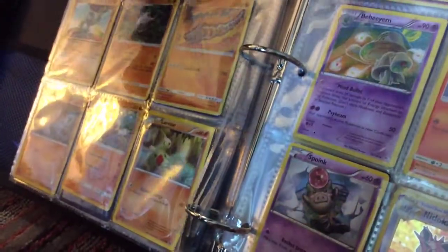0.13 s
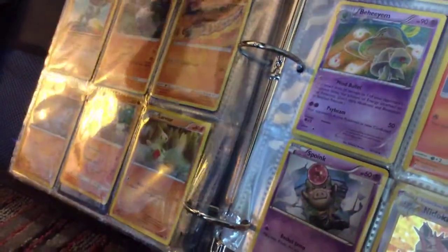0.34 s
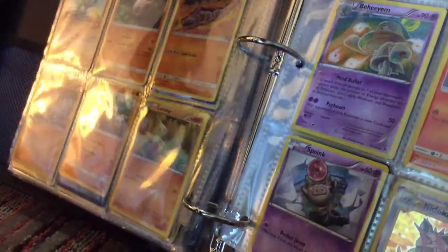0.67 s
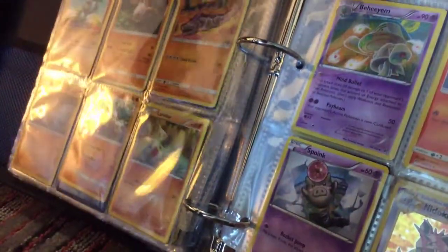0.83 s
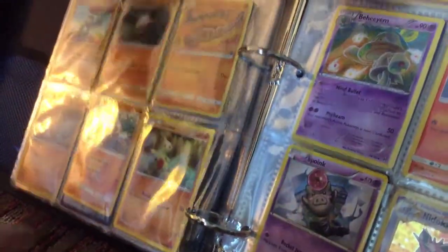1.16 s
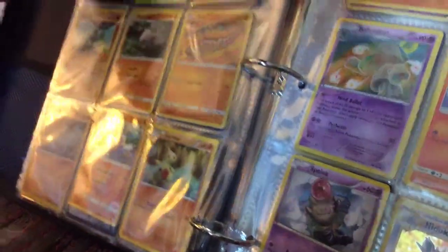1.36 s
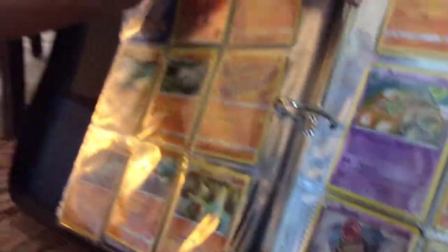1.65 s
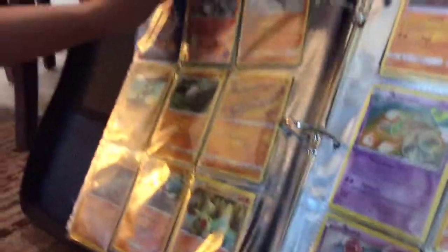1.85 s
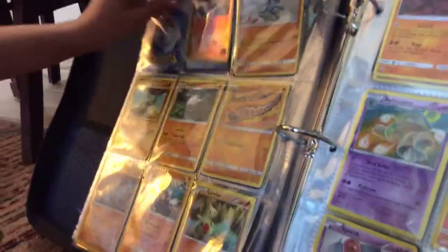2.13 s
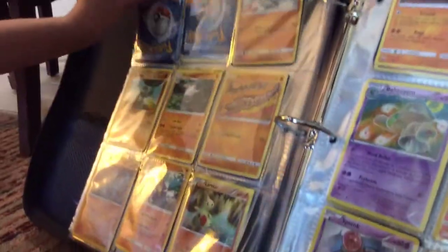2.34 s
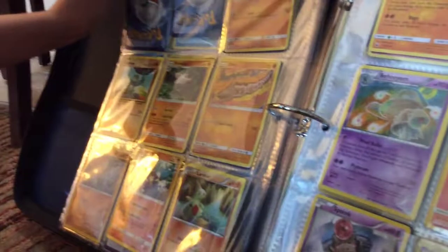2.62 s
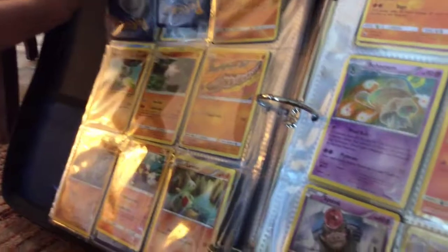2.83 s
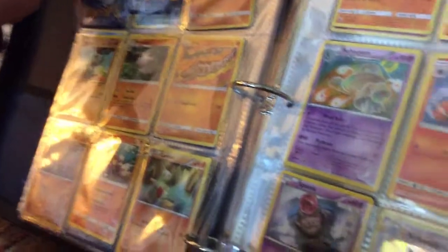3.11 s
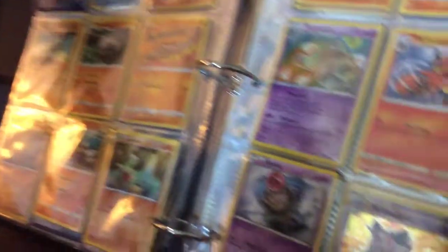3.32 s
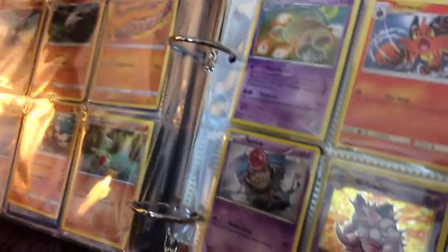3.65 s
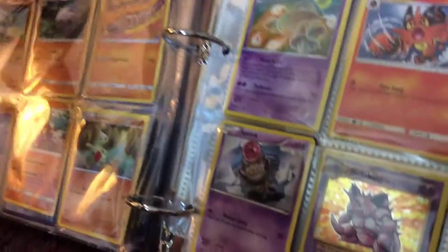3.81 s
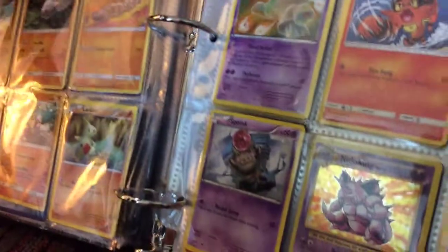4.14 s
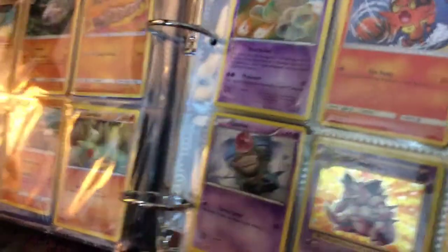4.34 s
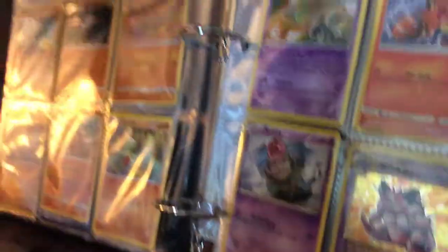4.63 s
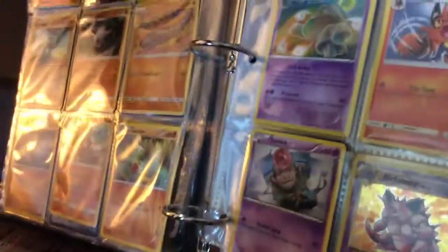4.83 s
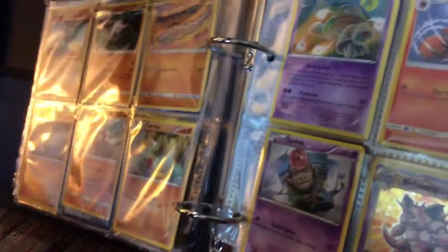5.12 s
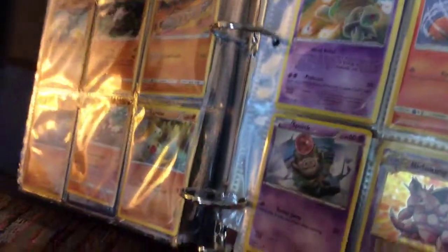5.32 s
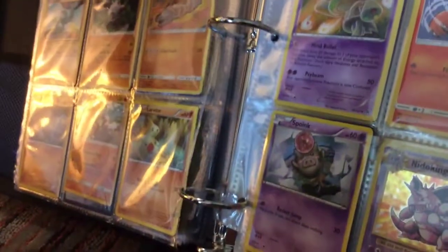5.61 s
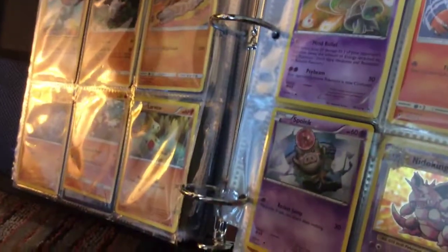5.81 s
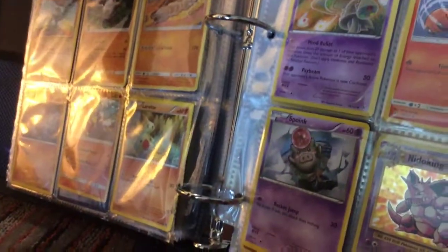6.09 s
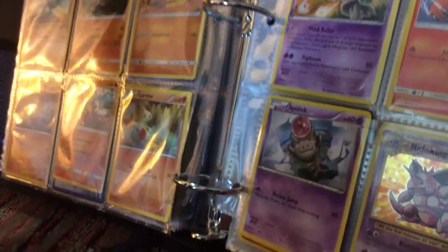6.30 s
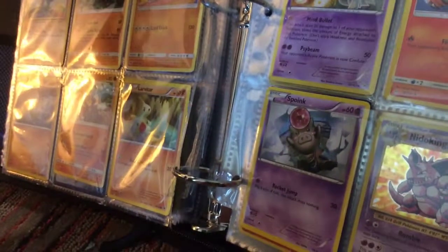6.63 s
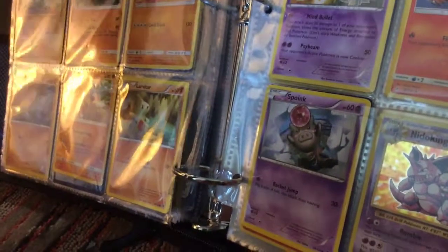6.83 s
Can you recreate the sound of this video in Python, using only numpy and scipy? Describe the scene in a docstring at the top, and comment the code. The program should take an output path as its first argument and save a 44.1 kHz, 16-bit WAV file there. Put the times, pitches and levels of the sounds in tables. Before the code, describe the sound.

Thin plastic pages crinkle in a ring binder: sharp treble-heavy pops, small pitched ticks, faint low knocks and brief papery rubs. A strong snap cluster early on gives way to sparse crackling, then isolated sharp clicks and a final busy flurry. Soft low fan rumble and airy rush continue underneath. Close, dry phone pickup indoors with very little room tail.

```python
"""Stiff clear plastic sleeve pages of a ring binder, bent and slid by hand close to a phone in a quiet room.
From the start a far fan hums and rushes, as filtered noise and a wavering sine, under snaps and short hiss.
Creases snap as bursts of slips coloured by resonances, loudest near 1.3 s; rubbing is grainy noise in the
same four bands. From 1.3 s short pitched ticks and low knocks join, each one narrow resonance; from 2.8 s
a few low scuffs of noise. Snaps thin out around 3 s, return, and crowd again from 6.4 s to the end near 7 s."""
import sys
import numpy as np
from scipy import signal
from scipy.fft import rfft, irfft, next_fast_len
from scipy.io import wavfile
from scipy.ndimage import uniform_filter1d

SR = 44100
rng = np.random.default_rng(int(sys.argv[2]) if len(sys.argv) > 2 else 0)


def to_wav(sig):
    """Store sig (one row per channel, or 1-D mono) as 16-bit WAV at the path in sys.argv[1].

    Samples outside -1..1 are clipped; the rate is SR.
    """
    pcm = np.clip(np.atleast_2d(sig), -1, 1) * 32767
    pcm = np.round(pcm).astype(np.int16)
    wavfile.write(sys.argv[1], SR, pcm.T)  # frames by channels


N = 306936

# Settings named WANDER, FLICKER, PATCHY or CATCH scale walk(), whose rms is about 1.4.
# Source levels are ahead of the room and the phone.

# Creases snapping. Each row: start in seconds, peak of the high band in dB, low, mid and top bands
# over the high band in dB, tear decay in ms (limited to 0.1-9 in use).
CREASE_SNAPS = [(0.0593, -17.5, -51, -56.5, -2, 2.6), (0.214, -29, -15.5, -17, -12, 0.93),
                (0.271, -16.5, -34, -22, -11, 1.2), (0.275, -21.5, -13, -15, -3, 2.9),
                (0.2811, -19.5, -22, -9, 0.5, 3), (0.3313, -16.5, -17, -13, -7, 3.5),
                (0.4058, -36.5, -8, -7, -9, 2.3), (0.536, -25.5, -31, -10.5, -8, 0.47),
                (0.6755, -34.5, -13.5, -10, -2, 5.1), (0.9558, -25.5, -28, -9.5, -9, 3.3),
                (0.988, -34.5, -29, -8.5, -9, 2.7), (1.0278, -33.5, -19, -24, -1, 4.3),
                (1.0646, -35.5, -12, -18, -8, 3), (1.2178, -40, -7.5, 1, 11, 2),
                (1.2572, -9.5, -18, -14.5, 1, 2.3), (1.2721, -2.5, -34, -46, -10, 1.8),
                (1.285, -35, -9, 1, -6, 3.7), (1.3193, -22.5, -19, -12, -7, 11),
                (1.3255, -21, -15, -18, -20, 1.6), (1.3281, -19, -13.5, -7, -8, 4.7),
                (1.338, -23, -40, -30, -1, 0.65), (1.418, -35, -10.5, -10, -4, 2.2),
                (1.4568, -22.5, -32, -12, -8, 0.53), (1.4699, -8.5, -22, -5.5, -7.5, 2.3),
                (1.482, -41, -19, 4, -6.5, 3.5), (1.5367, -39, -2.5, 1, -3, 3.8),
                (1.561, -33, -26, -7, -20, 1.5), (1.5766, -16, -24, -23.5, -14, 2.7),
                (1.6135, -37, -5, -4, -13, 2.3), (1.7991, -35, -23, -1.5, -25, 1.7),
                (1.81, -43.5, 6, -8, -7, 2.8), (1.8425, -26.5, -12, -4, -7, 3.7),
                (1.855, -40, -8, -7, -12, 2.7), (1.8622, -30.5, -9.5, -11, 1, 3.3),
                (1.9426, -38, -8, -8, -11, 3), (1.9523, -25.5, -26, -5, 6.5, 1.83),
                (1.957, -28.5, -10, -9, -14, 9), (1.972, -35.5, -8, -0.5, -2, 6),
                (1.9928, -36.5, -14, -3, 4, 1.7), (2.1892, -12, -25, -14, -6, 2.27),
                (2.227, -28, -10, -10, -15, 1.4), (2.273, -40.5, -9, 4, -11, 3.3),
                (2.4448, -22, -23, -16.5, -7, 2.1), (2.566, -18.5, -30, -16, -4, 2.1),
                (2.7721, -47.5, 8.5, 3.5, -1, 4.2), (3.2011, -27, -19, -10, -7, 3.1),
                (3.4432, -32.5, -16, -11.5, -1, 2), (3.712, -36.5, -14, -10.5, -4, 5),
                (3.8626, -15.5, -31, -35, -7, 2.2), (3.8988, -35.5, -6, 0, 6, 0.67),
                (3.9888, -13.5, -63, -11, -1.5, 2), (4.023, -34.5, -35, -9, -11, 9.7),
                (4.1462, -20.5, -27, -24, -5, 2.9), (4.1742, -24.5, -5, 3, 4, 2.7),
                (4.488, -39, -11.5, -8, -12, 2.4), (4.5478, -45, -6, -5, 15, 3.5),
                (4.571, -36.5, -4, -2, 7, 4), (4.6333, -29, -18, -12, -18, 1.7),
                (4.6812, -42.5, 1, -4, -1, 5.1), (4.7274, -39, -18, -18, 3, 4.6),
                (4.8418, -12.5, -16, -21.5, -3.5, 2.2), (4.9591, -33, -15, -5, 2.5, 2.6),
                (4.9688, -41, -11, -7, -7.5, 1.2), (5.038, -35.5, -28, -21, 8.5, 0.81),
                (5.161, -37.5, -11.5, -15, -2, 4.9), (5.3266, -35.5, 0, -7, 6, 5.5),
                (5.427, -38.5, -17, -25, -5, 2.2), (5.5275, -37, -36, -30, 2, 2.1),
                (6.0117, -24.5, -17, -12.5, -2, 3.1), (6.0157, -32, -39, -7, 2, 5.8),
                (6.182, -28, -20, -12, -9, 2.1), (6.3588, -40.5, -16, -8, 7, 1.1),
                (6.3892, -17.5, -21, -17.5, -6, 2.35), (6.4832, -31, -13, -13, 10, 5),
                (6.488, -27, -15, -22, -15.5, 4.5), (6.515, -18, -46, -26, -28, 2.2),
                (6.5295, -17.5, -22, -13.5, -8, 4.9), (6.5506, -14.5, -21, -20, -3, 0.83),
                (6.8494, -19.5, -24, -9, -11, 1.8), (6.89, -28, -4.5, -5, -1.5, 4.8)]
# Lesser creases that tick clearly. Each row: start in seconds, peak of the high band in dB.
CLEAR_TICKS = [(0.3651, -42), (0.4703, -43.5), (1.0437, -41), (1.3654, -40.5), (1.6276, -40.5),
               (2.1111, -43), (2.8135, -45.5), (2.9602, -52), (3.008, -44), (3.1685, -47), (3.5803, -52),
               (4.3071, -44.5), (4.8534, -42), (5.0514, -44), (5.1708, -36), (5.3916, -46), (5.4405, -41.5),
               (6.2517, -55), (6.7287, -44)]
# Resonances that colour the snaps and hiss, in four bands. Each row: nominal frequency in Hz,
# width in Hz, relative strength in dB.
HIGH_MODES = [(6790, 650, -9.5), (7310, 990, -10.5), (8300, 980, -1), (9475, 580, 1.5)]
LOW_MODES = [(1110, 180, 8.2), (1912, 307, 16.6)]
MID_MODES = [(3590, 610, 1.7), (4300, 610, -1.2)]
TOP_MODES = [(10510, 530, 17.9), (12420, 2100, 14), (13170, 1400, 14)]
LEAD_IN_DB, LEAD_IN_MS = -21, 4
RELEASE_MS, SLIP_SPREAD_DB = 18, 3.5  # first slip = RELEASE_MS / tear ms
LINGER = 0.5  # share of the tear that decays at the plain rate
PITCH_SPREAD, MODE_SPREAD_DB = 0.03, 2.5  # PITCH_SPREAD: relative, drawn per snap and band

# Mean levels of a small tick's low, mid and top bands, in dB over the high band.
SMALL_TICK_BANDS_DB = [-15, -8, -2]
TICK_COLOUR_DB, TICK_SPREAD_DB = 6.5, 2
TICK_OVER_HISS_DB = 10  # high band over dull hiss gain
TICK_TEAR_MS = 1.5  # median
TICK_CROWDING = 0.32  # exponent: pull of ticks towards firm strokes

# Strokes of sheet over sheet. Each row: start of full pressure in seconds, hold in seconds,
# high hiss gain in dB, dull (low and mid) and top hiss gains over high in dB.
RUB_STROKES = [(0.073, 0.019, -62.5, -9.5, -3), (0.131, 0.1, -62, -5.5, 0), (.25, 0.12, -56.5, -2.5, -1),
               (0.389, 0.03, -58.5, -3, -10), (0.544, 0.0091, -53, -3, -4), (0.829, 0.027, -59, -13.5, 6),
               (.88, 0.024, -50, -12, 1), (0.952, 0.012, -49, -5.5, -2), (1.02, 0.0069, -59.5, 0, -12),
               (1.097, 0.18, -59.5, -9.5, 1.5), (1.262, .07, -49, -1, -3), (1.37, 0.038, -62.5, 0.5, -18),
               (1.471, 0.091, -57.5, 1, -6), (1.634, 0.0082, -54, -6, -8), (1.808, 0.025, -54, -0.5, -2),
               (1.96, 0.014, -55.5, 2, -9), (2.01, .12, -56.5, -3.5, -1), (2.2, 0.032, -50.5, -3, -4),
               (2.271, 0.13, -56.5, -9, -1), (2.459, 0.046, -54, -12.5, -7), (2.549, 0.02, -61.5, -2.5, -5),
               (2.75, 0.014, -58.5, -9, -7), (2.969, 0.039, -64, 1, -5), (3.188, 0.015, -55, -2.5, -7),
               (3.351, 0.068, -63, -9.5, 3.5), (3.52, .02, -58.5, -1.5, -4), (3.7, 0.016, -60, -10, 3),
               (3.8, 0.039, -57.5, -21.5, 5), (3.86, 0.092, -48, -11, 2.5), (4.03, 0.17, -53, -13.5, 3),
               (4.179, 0.063, -54.5, 1, 0), (4.549, 0.045, -50, -5, 3.5), (4.629, 0.028, -59, -2, 4),
               (4.71, 0.023, -53.5, -7.5, 3), (4.85, 0.025, -52, -6.5, -8), (4.948, 0.13, -57, -1.5, 0.5),
               (5.175, 0.015, -57, -5.5, 1), (5.328, 0.07, -59.5, 0.5, -2),
               (5.519, 0.038, -58.5, -10.5, 0.5), (5.83, 0.015, -54, -7, 4.5), (6.03, 0.11, -50, -10, 3),
               (6.39, 0.024, -61.5, -5, 2), (6.493, 0.066, -59.5, 0.5, 1), (6.682, 0.022, -50.5, -10, -4),
               (6.849, 0.029, -56, 0, 3)]
PRESS_DB_PER_S, LIFT_DB_PER_S = 520.5, 369
REST_DB = -73  # gain floor: the sheets never lie quite still
GRIT_SPREAD_DB, BRIGHT_GRIT_DB, CATCH_DB = 2.0, -3, 3
PATCHY_DB, PATCHY_PER_S = 1.4, 60

# Short pitched ticks and low knocks, alone or within snaps. Each row: start in seconds, peak in dB,
# pitch in Hz.
PITCHED_TICKS = [(1.2715, -49, 790), (1.481, -32, 6000), (2.7703, -42.5, 1100), (4.158, -45, 5980),
                 (1.403, -44, 8450), (1.426, -41, 8700), (1.845, -36.5, 6200), (2.044, -46, 1600),
                 (2.089, -43, 4300), (2.2667, -36, 6150), (2.271, -32, 6240), (2.2747, -45, 2830),
                 (3.222, -47.5, 1030), (3.874, -46, 5800), (4.213, -45, 3300), (4.725, -43.5, 4420),
                 (5.036, -37, 5900), (6.487, -42.5, 1100), (6.8921, -40.5, 1150)]
PITCHED_WIDTH, PITCHED_MS = 0.17, 3.5  # width as share of pitch; decay of the driving noise

# Whole page shifting. Each row: start of full pressure in seconds, hold in seconds, gain in dB.
PAGE_SCUFFS = [(2.809, 0.024, -63.5), (3.2, 0.017, -65), (3.34, 0.09, -64), (4.73, 0.14, -60.5),
               (5.499, 0.04, -65)]
# Resonances that colour the scuffs. Each row: frequency in Hz, width in Hz, relative strength in dB.
SCUFF_MODES = [(870, 200, 5.5), (1880, 3900, -6)]

# Spectrum of the fan's air. Each row: frequency in Hz, relative density in dB per Hz.
AIR_SPECTRUM = [(36, -23), (48, -3.5), (200, -5.5), (378, -17.5), (858, -19.5), (1380, -28), (2470, -35),
                (3480, -30), (4770, -35), (7090, -37.5), (9480, -41), (13000, -41), (15800, -57)]
# Narrow bands where the air booms. Each row: frequency in Hz, resonator width in Hz, rms in dB.
DRONE_BANDS = [(119, 14, -54.5), (147, 10, -61), (225, 12, -62), (291, 18, -68)]
AIR_DB, AIR_FLICKER_DB = -55, 1.1
HUM_HZ, HUM_WANDER_HZ, HUM_DB, HUM_WANDER_DB = 56.4, 0.27, -51.5, 0.5

ROOM_T60_S, ROOM_DB = 0.14, -21
DIP_HZ, DIP_WIDTH_HZ, DULL_HZ, TOP_HZ = 4790, 250, 15000, 16200


def undb(db):
    """Decibels to amplitude ratio."""
    return 10 ** (np.asarray(db) / 20)


def level(x, db):
    """Scale to an rms of db."""
    return x * undb(db) / np.sqrt(np.mean(x ** 2))


def ring(x, modes, stretch=1, spread_db=0):
    """Sum of resonances of alternating sign; stretch shifts all, spread_db varies each one's strength."""
    size = next_fast_len(x.shape[-1] + 2048)
    f = np.fft.rfftfreq(size, 1 / SR) / stretch
    luck_db = spread_db * rng.standard_normal(np.shape(stretch) + (len(modes),))
    gain = 0
    for k, (hz, width_hz, db) in enumerate(modes):
        damping = 1j * f * width_hz
        resonance = damping / (hz ** 2 - f ** 2 + damping)
        gain = gain + (-1) ** k * undb(db + luck_db[..., k]) * resonance
    return irfft(rfft(x, size) * gain, size)[..., :x.shape[-1]]


def walk(rate_hz):
    """Normal random levels, rate_hz per second, joined by straight slews; rms about 1.4."""
    step = int(SR / rate_hz)
    held = np.repeat(rng.standard_normal(N // step + 1), step)
    return 1.72 * uniform_filter1d(held, step)[:N]


def snaps():
    """Faint noise swells briefly, one sharp slip follows, then smaller slips die away, in four bands."""
    s, db, low_db, mid_db, top_db, tear_ms = np.vstack([CREASE_SNAPS, small_ticks()]).T
    size, lead = 1536, 512
    ms = (np.arange(size) - lead) / SR * 1000
    slip_gain = undb(SLIP_SPREAD_DB * rng.standard_normal((len(s), size)))
    slips = rng.standard_normal((len(s), size)) * slip_gain
    lead_in = undb(LEAD_IN_DB) * np.exp(np.minimum(ms, 0) / LEAD_IN_MS)
    tear = np.exp(-np.maximum(ms, 0) / np.clip(tear_ms, 0.1, 9)[:, None])
    tear *= LINGER + (1 - LINGER) * tear ** 2  # most of the strain is gone early
    slips *= np.where(ms < 0, lead_in, tear)
    slips[:, lead] = RELEASE_MS / np.clip(tear_ms, 0.5, 9)  # a slow tear starts softly
    stretch = 1 + PITCH_SPREAD * rng.standard_normal((len(s), 4))
    bands = ((HIGH_MODES, 0 * db), (LOW_MODES, low_db), (MID_MODES, mid_db), (TOP_MODES, top_db))
    ticks = 0
    for k, (modes, over_db) in enumerate(bands):
        band = ring(slips, modes, stretch[:, [k]], MODE_SPREAD_DB)
        band = band / np.abs(band).max(axis=1, keepdims=True)
        ticks = ticks + band * undb(db + over_db)[:, None]
    out = np.zeros(N + size)
    for start, tick in zip((s * SR).astype(int), ticks):
        out[start:start + size] += tick
    return out[lead:N + lead]


def small_ticks(count=100):
    """Snap rows for lesser creases: the clear ones, then random ones, more and louder in rough, dull strokes."""
    dull = strokes()[1]
    odds = np.cumsum(dull ** TICK_CROWDING)
    at = np.searchsorted(odds, rng.random(count) * odds[-1])
    clear = len(CLEAR_TICKS)
    chance = rng.standard_normal((clear + count, 5))
    s, db = np.transpose(CLEAR_TICKS)
    s = np.append(s, at / SR)
    random_db = 20 * np.log10(dull[at]) + TICK_OVER_HISS_DB + TICK_SPREAD_DB * chance[clear:, 0]
    db = np.append(db, random_db)
    bands_db = np.array(SMALL_TICK_BANDS_DB) + TICK_COLOUR_DB * chance[:, 1:4]
    tear_ms = TICK_TEAR_MS * np.exp(0.46 * chance[:, 4])
    return np.column_stack([s, db, bands_db, tear_ms])


def rubbing():
    """Sheets drag over each other: a hiss that flutters, in the same resonances as the snaps."""
    flutter = undb(2.0 * walk(50))
    grit = level(fizz(900, GRIT_SPREAD_DB), 0)
    bright_grit = undb(BRIGHT_GRIT_DB) * grit
    high_gain, dull_gain, top_gain = strokes()
    high = high_gain * drag(HIGH_MODES, -0.25, bright_grit, flutter)
    top = top_gain * drag(TOP_MODES, -3.5, bright_grit, flutter)
    mid = drag(MID_MODES, -5.0, undb(-5.5) * grit, flutter)
    low = drag(LOW_MODES, -10.0, grit, flutter)
    return high + top + dull_gain * (mid + low)


def strokes():
    """High, dull and top hiss gains over time, from hand pressure above a resting floor."""
    s, held_s, db, dull_db, top_db = np.transpose(RUB_STROKES)
    return [np.hypot(pressure(s, held_s, d), undb(REST_DB)) for d in (db, db + dull_db, db + top_db)]


def pressure(s, held_s, db):
    """Gain over time: each stroke rises, holds and fades at fixed dB rates; overlaps add in power."""
    t = np.arange(0, N + 64, 64)[:, None] / SR
    rise_db = PRESS_DB_PER_S * np.maximum(s - t, 0)
    fall_db = LIFT_DB_PER_S * np.maximum(t - s - held_s, 0)
    gain = np.sqrt(np.sum(undb(db - rise_db - fall_db) ** 2, axis=1))
    return np.interp(np.arange(N) / SR, t[:, 0], gain)


def drag(modes, db, grit, flutter):
    """Grainy friction noise that catches, through one band's modes; each tone's level wanders at random."""
    force = rng.standard_normal(N) + grit * undb(CATCH_DB * walk(120))
    out = 0
    for k, mode in enumerate(modes):
        patchy = undb(PATCHY_DB * walk(PATCHY_PER_S))
        out = out + (-1) ** k * ring(force * flutter * patchy, [mode])
    return level(out, db)


def fizz(per_s, spread_db):
    """Tiny slips at random moments, a few much larger than the rest."""
    hits = rng.random(N) < per_s / SR
    return hits * rng.standard_normal(N) * undb(spread_db * rng.exponential(size=N))


def pitched_ticks():
    """Short pitched ticks and low knocks: a decaying noise burst rings one narrow resonance."""
    size = 1024
    ms = np.arange(size) / SR * 1000
    out = np.zeros(N + size)
    for (s, db, hz), burst in zip(PITCHED_TICKS, rng.standard_normal((len(PITCHED_TICKS), size))):
        tick = ring(burst * np.exp(-ms / PITCHED_MS), [(hz, PITCHED_WIDTH * hz, 0)])
        tick = ring(tick, [(hz, 4 * PITCHED_WIDTH * hz, 0)])  # steeper skirts
        start = int(s * SR)
        out[start:start + size] += tick / np.abs(tick).max() * undb(db)
    return out[:N]


def scuffs():
    """The whole page shifts with a low, grainy brush: friction noise in two resonances."""
    grit = level(fizz(300, 0.95), 0)
    brush = drag(SCUFF_MODES, 0, grit, undb(2.0 * walk(33)))
    return pressure(*np.transpose(PAGE_SCUFFS)) * brush


def fan():
    """A wavering motor tone and a booming drone with the gently flickering rush of air."""
    f = np.fft.rfftfreq(N, 1 / SR)
    hz, db = np.transpose(AIR_SPECTRUM)
    air_gain = undb(np.interp(np.log(f + 1), np.log(hz), db))
    air = irfft(rfft(rng.standard_normal(N)) * air_gain, N)
    air = level(air, AIR_DB) * undb(AIR_FLICKER_DB * walk(14))
    phase = 2 * np.pi * np.cumsum(HUM_HZ + HUM_WANDER_HZ * walk(12)) / SR
    hum = np.sqrt(2) * np.sin(phase) * undb(HUM_DB + HUM_WANDER_DB * walk(25))
    drone = 0
    for hz, width_hz, db in DRONE_BANDS:
        band = ring(rng.standard_normal(N), [(hz, width_hz, 0)])
        drone = drone + level(ring(band, [(hz, 2 * width_hz, 0)]), db)
    return air + hum + drone


def surroundings():
    """Impulse response: direct sound and the short, decaying noise tail of a carpeted room."""
    t = np.arange(int(0.3 * SR)) / SR
    noise = np.diff(rng.standard_normal(len(t) + 1))  # tilted to treble
    tail = noise * np.exp(-np.log(1000) * t / ROOM_T60_S) * np.clip(t / 0.027, 0, 1)
    reply = undb(ROOM_DB) * tail / np.sqrt(np.sum(tail ** 2))
    reply[0] = 1
    return reply


def scene():
    """Pages sound in the room; the fan is added without its tail."""
    handling = snaps() + pitched_ticks() + rubbing() + scuffs()
    pages = signal.fftconvolve(handling, surroundings())[:N]
    return (pages + fan())[None]


def record(dry):
    """The phone's case leaves a dip and dulls the top, which is then cut."""
    notched = signal.lfilter(*signal.iirnotch(DIP_HZ, DIP_HZ / DIP_WIDTH_HZ, fs=SR), dry)
    dipped = 0.5 * (notched + dry)  # half-depth dip
    dull = signal.sosfilt(signal.butter(3, DULL_HZ, fs=SR, output="sos"), dipped)
    return signal.sosfilt(signal.ellip(10, 0.2, 80, TOP_HZ, fs=SR, output="sos"), dull)


dry = scene()
out = record(dry)
to_wav(out)
```